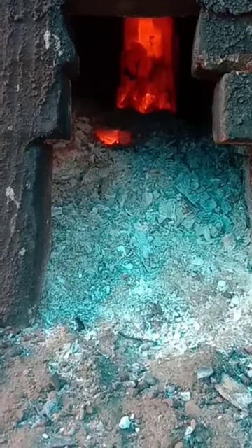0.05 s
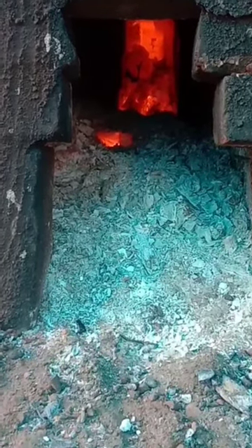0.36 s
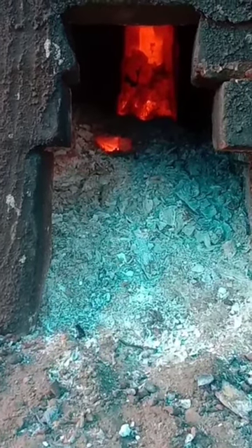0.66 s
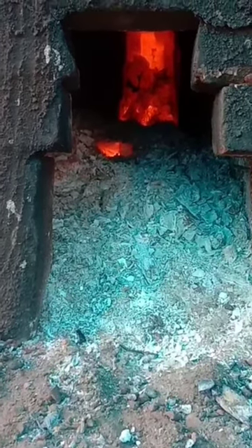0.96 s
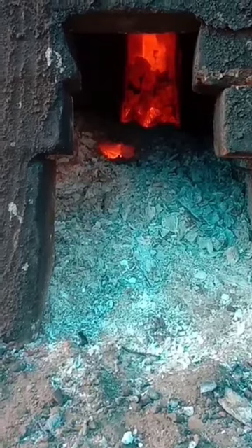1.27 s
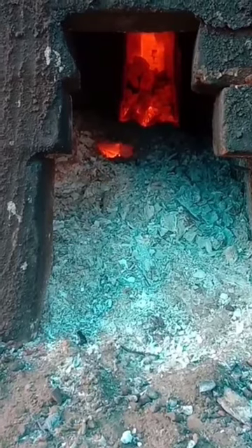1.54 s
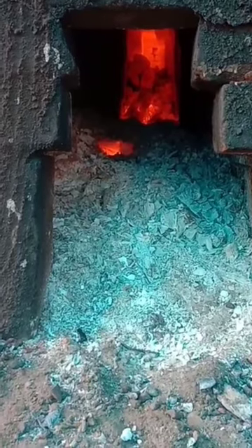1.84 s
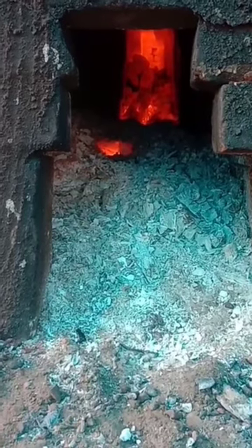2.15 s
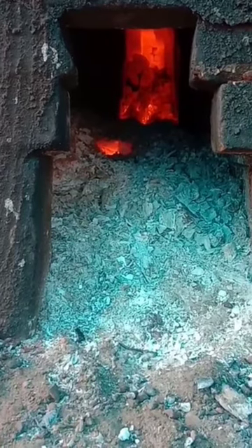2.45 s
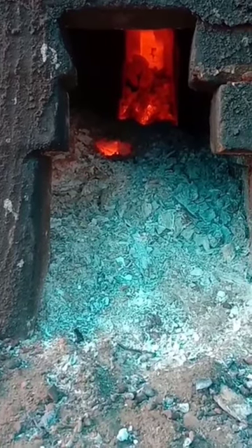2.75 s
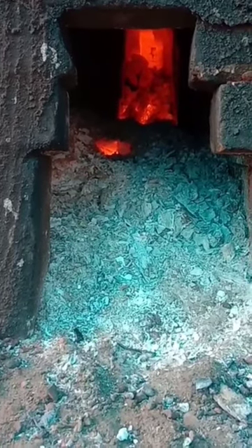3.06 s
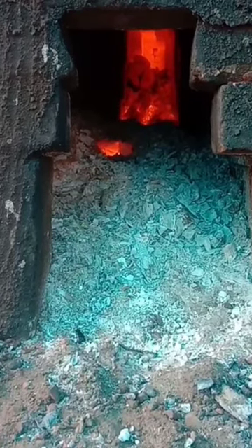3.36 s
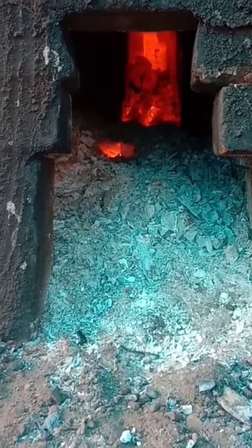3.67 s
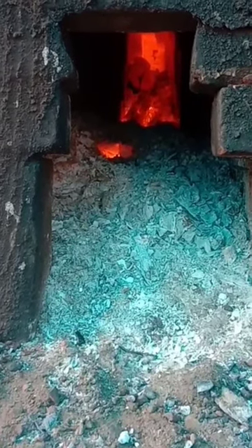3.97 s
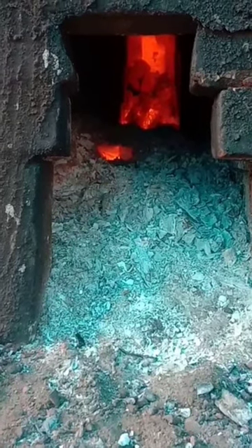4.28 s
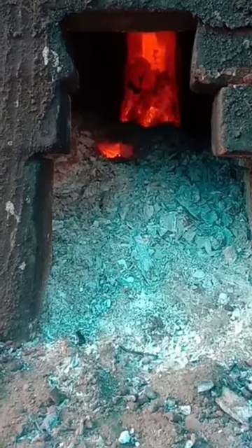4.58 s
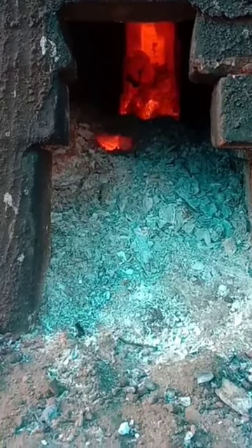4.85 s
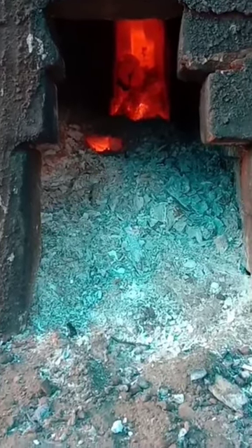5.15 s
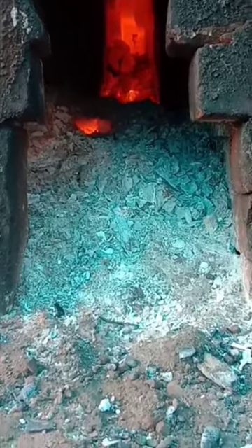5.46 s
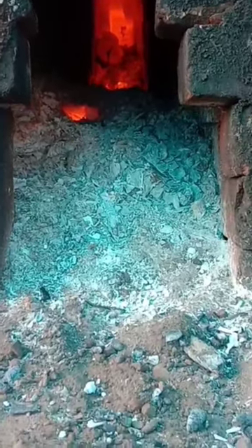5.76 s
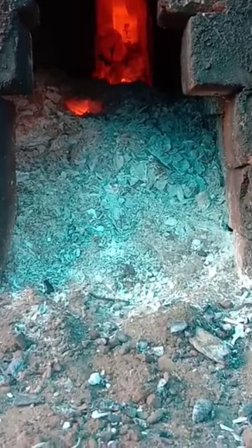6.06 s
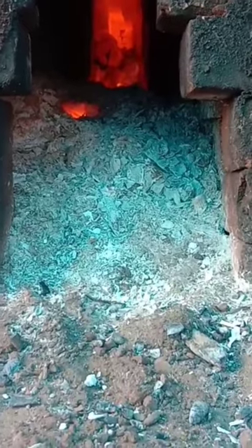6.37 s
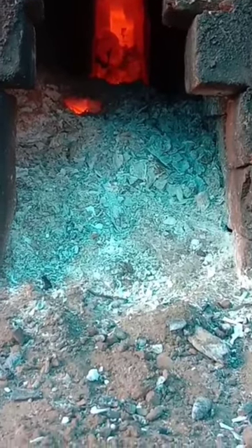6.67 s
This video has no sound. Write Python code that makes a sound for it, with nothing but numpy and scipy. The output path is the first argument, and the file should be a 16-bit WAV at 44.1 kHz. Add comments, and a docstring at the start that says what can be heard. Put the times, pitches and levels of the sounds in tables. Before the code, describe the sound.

Outdoors at the opening of a brick kiln, embers give small, sharp snaps over a low wind rumble and faint hiss. A distant engine throbs underneath. A gust builds, thumping on the microphone and stirring grit into a dry rustle. Then the wind eases and the crackles thin out, leaving the throb and a faint whirr of air. A few more wind thumps and one tiny squeak come near the end.

```python
"""Wind at a brick kiln

Outdoors at the stoke hole, the fire crackles and air whirrs in the flue while a distant engine throbs.
A gust swells in the middle and stirs grit into a dry rustle; its eddies (small swirls of air) thump
on the microphone. A faint hum wavers far away; there are a few soft scuffs of ash and one tiny squeak."""
import sys
import numpy as np
from scipy import signal
from scipy.fft import rfft, irfft
from scipy.io import wavfile
from scipy.ndimage import uniform_filter1d, map_coordinates

SR = 44100
rng = np.random.default_rng(int(sys.argv[2]) if len(sys.argv) > 2 else 0)


def file_out(sig):
    """Save sig as 16-bit WAV at sys.argv[1]."""
    # one column per channel
    cols = np.atleast_2d(sig).T
    # limit, then scale
    lim = np.clip(cols, -1, 1)
    pcm = np.round(lim * 32767).astype(np.int16)
    wavfile.write(sys.argv[1], SR, pcm)


N = 305172
TIME = np.arange(N) / SR

# how strongly the wind blows: (time [s], level [dB])
WIND = [(0, -46.5), (.5, -46), (1.15, -42.5), (1.5, -48.5), (1.75, -39), (2.4, -35.5), (2.67, -32.5),
        (2.92, -41), (3.25, -39.5), (4.3, -56.5), (5.7, -51.5), (6.25, -47), (6.92, -51)]


def from_db(db):
    """Turn decibels into a number to multiply a sound by."""
    return 10 ** (np.asarray(db) / 20)


def rms_one(x):
    """Scale a sound to an average power of 1."""
    return x / np.sqrt(np.mean(x ** 2) + 1e-20)


def in_time(rows):
    """Join a table's points with straight lines, giving one value per sample for each column after time."""
    s, *columns = np.transpose(rows)
    return [np.interp(TIME, s, c) for c in columns]


def cut(x, hz, kind, order=2):
    """Keep the "low" or the "high" side of a sound; a higher order cuts more sharply."""
    return signal.sosfilt(signal.butter(order, min(hz, SR / 2 - 100), kind, fs=SR, output="sos"), x)


def resonate(x, hz, width_hz):
    """Keep the band around one pitch, so that it rings."""
    return signal.lfilter(*signal.iirpeak(hz, hz / width_hz, fs=SR), x)


def drift(rate):
    """A smooth random wobble of about 1, passing through `rate` random values a second."""
    knots = rng.standard_normal(2048)
    return rms_one(map_coordinates(knots, [TIME * rate], order=3, mode="wrap"))


def coloured(x, spectrum):
    """Set how strong the low and high parts of a sound are; the result has power 1."""
    hz, db = np.transpose(spectrum)
    bins = np.maximum(np.fft.rfftfreq(N, 1 / SR), 1)
    gain = from_db(np.interp(np.log(bins), np.log(hz), db))
    return rms_one(irfft(rfft(x) * gain, N))


def evened(x, seconds):
    """Take the slow swells out of a noise, leaving its power near 1."""
    return x / np.sqrt(uniform_filter1d(x ** 2, max(int(seconds * SR), 8)) + 1e-12)


def grains(per_s, spread_db):
    """Random clicks; with a spread above 0, most are small and a few are large."""
    sizes = from_db(spread_db * np.minimum(rng.exponential(1, N), 4)) * rng.choice([-1, 1], N)
    return sizes * (rng.random(N) < per_s / SR)


def wavering(x, depth_db, patch_hz, patch_s):
    """Narrow bands of a noise swell and fade, each on its own, so it sounds hollow and unsteady."""
    hz, s, frames = signal.stft(x, SR, nperseg=1024)
    chance = rng.standard_normal((512, 512))
    grid = np.meshgrid(hz / patch_hz, s / patch_s, indexing="ij")
    swells = map_coordinates(chance, grid, order=2, mode="wrap")
    return rms_one(signal.istft(frames * from_db(depth_db * swells), SR)[1][:N])


def rumble(level_db=1.4, flutter_db=2.0):
    """Churning air around the kiln makes a low, fluttering rumble."""
    # tone of the rumble: (frequency [Hz], level [dB])
    spectrum = [(20, -23), (40, -16), (58, -2), (78, 8.5), (125, 4.5), (165, -2), (215, 0.5), (290, -6),
                (400, -21), (600, -31), (900, -31.5), (1600, -64.5)]
    wind_db, = in_time(WIND)
    noise = evened(coloured(rng.standard_normal(N), spectrum), seconds=0.27)
    return from_db(wind_db + level_db + flutter_db * drift(28)) * noise


def engine(firings_per_s=26.0, boom_hz=104.4, boom_width_hz=14, jitter_s=0.00066, uneven_db=4.5):
    """Each uneven exhaust stroke is a low thud; together they boom near four times the firing rate."""
    # the distant throb, as the wind carries it: (time [s], level [dB])
    throb = [(0, -47), (.72, -59), (.9, -38), (1.55, -45.5), (1.8, -38), (3.2, -40.5), (3.55, -45.5),
             (4.4, -41.5), (4.62, -53), (4.85, -46), (5.5, -46.5), (6.15, -35), (6.55, -40.5),
             (6.92, -41.5)]
    throb_db, = in_time(throb)
    beats = np.flatnonzero(np.diff(np.floor(firings_per_s * TIME)))
    late, strength = rng.standard_normal((len(beats), 2)).T
    at = np.clip(beats + (late * jitter_s * SR).astype(int), 0, N - 1)
    pulses = np.zeros(N)
    pulses[at] = from_db(uneven_db * strength)
    pulses = cut(cut(pulses, 60, "high"), 243, "low", order=3)
    boom = resonate(pulses, boom_hz, boom_width_hz)
    boom = evened(resonate(boom, boom_hz, 3 * boom_width_hz), seconds=0.25)
    knock = from_db(-8) * resonate(pulses, hz=205, width_hz=55)
    thud = resonate(pulses, hz=110, width_hz=55) - knock
    carried_db = throb_db + 2.5 * drift(18)  # it fades in and out on the wind
    return from_db(carried_db) * (boom + from_db(-7.5) * rms_one(thud))


def whirr(pitch_hz=1251, wander_hz=10, width_hz=45, level_db=-3.5):
    """Air drawn through the flue sings around one unsteady pitch."""
    # strength of the whirr: (time [s], level [dB])
    loudness = [(0, -58), (2.4, -53), (3.5, -57.5), (6.6, -58.5), (6.92, -69)]
    whirr_db, = in_time(loudness)
    hz = pitch_hz + wander_hz * drift(1.5)
    swirl = drift(1.5 * width_hz) + 1j * drift(1.4 * width_hz)  # blurs the tone into a narrow noise
    tone = np.exp(2j * np.pi * np.cumsum(hz) / SR)
    return from_db(whirr_db + level_db) * np.real(swirl * tone)


def far_hum(waver=0.02096, fade_db=5.0):
    """A far-off note and the octave above it waver and fade on the wind."""
    # course of the hum: (time [s], pitch [Hz], note level [dB], octave level [dB])
    hum = [(0, 288, -64, -62), (.7, 289, -80, -72), (1.35, 302.3, -72.5, -59.5), (1.8, 303, -58.5, -65.5),
           (3.0, 299, -61, -57.5), (3.8, 301, -54, -63), (4.2, 309.7, -71, -92), (5.5, 312.7, -59.5, -77),
           (6.1, 309.7, -72, -70)]
    hz, *levels_db = in_time(hum)
    phase = 2 * np.pi * np.cumsum(hz * (1 + waver * drift(60))) / SR
    return np.sqrt(2) * sum(from_db(db + fade_db * drift(16)) * np.sin(k * phase)
                            for k, db in enumerate(levels_db, 1))


def roar():
    """A dull, uneven roar swells with the gust."""
    # strength of the roar: (time [s], level [dB])
    loudness = [(0, -58.5), (1.05, -70.5), (1.35, -57.5), (2.1, -60.5), (2.55, -47.5), (3.55, -50.5),
                (3.95, -58.5), (5.4, -60), (6.35, -56), (6.92, -60.5)]
    # tone of the roar: (frequency [Hz], level [dB])
    spectrum = [(150, -17), (240, -1), (320, 6.5), (410, -4.5), (500, -2.5), (590, -0.5), (700, -8.5),
                (950, -9), (1400, -21.5), (2500, -54.5)]
    roar_db, = in_time(loudness)
    noise = coloured(rng.standard_normal(N), spectrum)
    return from_db(roar_db) * wavering(noise, depth_db=4.0, patch_hz=45, patch_s=.14)


def breeze(rush_over_hiss_db=6, loose_grit_db=-21, flutter_db=1.14, rise_s=0.024, fall_s=0.039):
    """Moving air rushes and hisses; the wind keeps a little grit moving, and puffs make it rustle."""
    # strength of the light breeze: (time [s], level [dB])
    air = [(0, -61.5), (1.5, -60), (3.2, -61.5), (4.8, -60.5), (5.5, -64.5), (6.92, -63)]
    # tone of the rushing air: (frequency [Hz], level [dB])
    rush_spectrum = [(250, -2.5), (450, -5.5), (600, -9), (800, -11), (1050, -2.5), (1400, 3.5),
                     (1750, -1.5), (2050, -8), (2600, -13.5), (4000, -20.5)]
    # tone of the high hiss: (frequency [Hz], level [dB])
    hiss_spectrum = [(1500, -26.5), (2400, -32.5), (2700, -6.5), (3000, 14), (3500, -1.5), (4200, 7),
                     (5000, -6), (5600, 5.5), (6300, 7.5), (7300, 10.5), (8000, 5), (12000, -10.5)]
    # tone of the moving grit: (frequency [Hz], level [dB])
    grit_spectrum = [(400, -2), (900, 3), (1300, 8), (1800, 2), (2400, 3), (4500, -5.5), (6200, -0.5),
                     (7500, -4.5), (9500, -4), (13000, -9)]
    # puffs of air that stir the grit: (start [s], length [s], rush level [dB], grit level [dB])
    puffs = [(0.193, 0.089, -55.5, -52.5), (1.13, 0.068, -43, -50), (1.257, 0.046, -45, -60),
             (1.363, 0.41, -50.5, -58), (2.233, .21, -46, -41.5), (2.44, .11, -45, -40),
             (2.62, 0.36, -74, -55.5), (2.836, 0.17, -54.5, -51)]
    air_db, = in_time(air)
    wind_db, = in_time(WIND)
    rush = coloured(rng.standard_normal(N), rush_spectrum)
    rush = wavering(rush, depth_db=4.5, patch_hz=69.84, patch_s=.07)
    hiss = coloured(rng.standard_normal(N), hiss_spectrum)
    hiss = wavering(hiss, depth_db=5.5, patch_hz=111.3, patch_s=.07)
    grit = coloured(grains(per_s=2200 * from_db(4.1 * drift(110)), spread_db=2.0), grit_spectrum)
    grit = wavering(grit, depth_db=4.5, patch_hz=206.7, patch_s=.025)
    rush_gain = from_db(air_db + rush_over_hiss_db)
    grit_gain = from_db(wind_db + loose_grit_db)
    for s, length_s, rush_db, grit_db in puffs:
        rise = np.clip((TIME - s) / rise_s, 0, 1)
        puff = rise * np.exp(-np.maximum(TIME - s - length_s, 0) / fall_s)
        rush_gain = np.hypot(rush_gain, from_db(rush_db) * puff)  # hypot adds their powers
        grit_gain = np.hypot(grit_gain, from_db(grit_db) * puff)
    flutter = from_db(flutter_db * drift(25))
    return flutter * (rush_gain * rush + grit_gain * grit) + from_db(air_db) * hiss


def crackles(snap_s=0.0033, tail_s=0.026, body_s=0.0088, snap_db=-7, tail_db=-15, body_db=-14):
    """An ember snaps at a pitch set by its size, with a dull body and a short scatter off the bricks."""
    # snapping embers: (time [s], level [dB], extra level of the body [dB], pitch [Hz])
    embers = [(0.17, -43, 3, 3970), (0.2443, -31, -25, 6700), (0.4861, -30, -26, 6940),
              (0.598, -34, -26, 6240), (0.622, -34.5, -29, 6300), (0.9909, -34.5, -16, 7350),
              (1.1543, -34.5, -3, 6230), (1.28, -44, 10, 3800), (1.6116, -37.5, 7.5, 6050),
              (1.7779, -32.5, -16, 4340), (2.128, -38, 6, 5930), (2.473, -25, -6, 3670),
              (2.6412, -39, 8, 3110), (3.0241, -25.5, -1.5, 5000), (4.6695, -37, -23, 6210),
              (4.7581, -40.5, -14, 5900), (6.2728, -41.5, -7, 3880)]
    out, t = np.zeros(N + SR), TIME[:SR // 8]
    for s, level_db, dull_db, hz in embers:
        bright, dull = rng.standard_normal((2, len(t)))
        bright = cut(bright, 3400, "high", order=3)
        bright = rms_one(bright + 2.9 * resonate(bright, hz, width_hz=700))
        snap = bright * (np.exp(-t / snap_s) + from_db(tail_db) * np.exp(-t / tail_s))
        body = rms_one(cut(cut(dull, 760, "high"), 2000, "low")) * np.exp(-t / body_s)
        crackle = from_db(snap_db) * snap + from_db(body_db + dull_db) * body
        at = int(s * SR)
        out[at:at + len(t)] += from_db(level_db) * crackle
    return out[:N]


def ticks(decay_s=0.0059, low_hz=7800):
    """The tiniest embers snap with only a thin, very high tick."""
    # tiny embers: (time [s], level [dB])
    embers = [(.487, -30), (4.216, -38), (4.887, -38), (5.888, -40)]
    fizz = rms_one(cut(rng.standard_normal(N), low_hz, "high", order=4))
    return fizz * sum(from_db(db) * (TIME >= s) * np.exp(-np.abs(TIME - s) / decay_s)
                      for s, db in embers)


def scuffs(low_hz=900, high_hz=3000):
    """Ash crunches in short, sudden bursts of dull grains."""
    # soft scuffs: (time [s], level [dB], fade time [s])
    bursts = [(1.152, -35, 0.0075), (1.277, -38, 0.011), (2.127, -47.5, 0.0077), (3.568, -50, 0.025),
              (3.992, -57, .015)]
    ash = grains(per_s=2700, spread_db=0.0)
    crunch = rms_one(cut(cut(ash, low_hz, "high"), high_hz, "low"))
    return crunch * sum(from_db(db) * (TIME >= s) * np.exp(-np.abs(TIME - s) / decay_s)
                        for s, db, decay_s in bursts)


def eddy_runs(gap_s=.018, jitter_s=.003, follower_db=-6.5):
    """Each blow of wind opens with its strongest eddy; weaker ones follow unevenly while it lasts."""
    # blows on the microphone: (time [s], length [s] or 0 for one eddy, level [dB], brightness [Hz])
    blows = [(1.224, 0, -15, 273), (1.407, 0, -24, 183), (1.642, 0, -19.5, 400), (1.657, .045, -8.5, 460),
             (1.709, .028, -9.5, 330), (1.82, .028, -15, 200), (1.987, .028, -7, 280),
             (2.099, 0, -17.5, 274), (2.128, 0, -13.5, 343), (2.173, 0, -17, 310), (2.505, .045, -8, 342),
             (2.603, .028, -9, 265), (2.674, .028, -19.5, 260), (2.779, 0, -21.5, 250),
             (3.039, 0, -14.5, 500), (3.052, 0, -8, 667), (3.066, 0, -14, 290), (3.202, 0, -13, 283),
             (3.238, 0, -12.5, 313), (3.263, .028, -12, 414), (6.057, 0, -19.5, 160),
             (6.152, .028, -10.5, 350), (6.244, .045, -11.5, 360)]
    for s, length_s, level_db, bright_hz in blows:
        yield s, level_db, bright_hz
        for k, late in enumerate(rng.uniform(-1, 1, 6), 1):
            if k * gap_s < length_s:
                yield s + k * gap_s + late * jitter_s, level_db + follower_db, bright_hz


def eddies(port_hz=92, leak_db=-27, wake_db=-26, wake_s=0.015, gain_db=-2.5):
    """Each eddy hits the microphone with one blunt push of air and a short, ragged wake."""
    out, t = np.zeros(N + SR), TIME[:SR // 5]
    for s, level_db, bright_hz in eddy_runs():
        push = from_db(wake_db) * rng.standard_normal(len(t)) * np.exp(-t / wake_s)
        push[0] += 1  # the hit itself, ahead of its wake
        push = cut(push, 0.44 * bright_hz, "low")
        push = cut(push, 1.47 * bright_hz, "low", order=4)
        push = cut(push, port_hz, "high", order=3) + from_db(leak_db) * push  # little slow push gets in
        ring = resonate(push, hz=125, width_hz=50) + 0.72 * resonate(push, hz=247, width_hz=92)
        thump = push + 0.5 * ring
        at = int(s * SR)
        out[at:at + len(t)] += from_db(level_db + gain_db) * thump / np.abs(thump).max()
    return out[:N]


def squeak(waver=0.016):
    """One faint, rough tone slides up and back down."""
    # course of the squeak: (time [s], pitch [Hz], level [dB])
    glide = [(6.19, 1630, -82), (6.225, 1657, -64), (6.25, 1750, -45), (6.29, 1870, -61), (6.37, 1780, -66),
             (6.48, 1730, -55), (6.56, 1525, -82)]
    hz, level_db = in_time(glide)
    sounding = (TIME > glide[0][0]) & (TIME < glide[-1][0])
    phase = 2 * np.pi * np.cumsum(hz * (1 + waver * drift(200))) / SR
    return sounding * from_db(level_db) * np.sin(phase)


def scene():
    """Everything reaches one microphone, so both channels are alike."""
    fire = whirr() + crackles() + ticks()
    wind = rumble() + roar() + eddies() + breeze()
    sound = fire + wind + engine() + far_hum() + scuffs() + squeak()
    return np.array([sound, sound])


def record(dry):
    """The microphone lifts the middle pitches and dulls the highs; a faint, steady noise lies behind."""
    # tone of the background noise, strongest in the bass: (frequency [Hz], level [dB])
    noise_spectrum = [(20, 21.5), (1200, 3), (4000, 2), (10000, -9), (14000, -13.5), (15000, -6),
                      (16000, -11.5)]
    sound = dry + .5 * resonate(dry, hz=1232, width_hz=220)
    sound = sound - .82 * resonate(sound, hz=6650, width_hz=400)  # a narrow dip in the highs
    faint_highs = from_db(-35.5) * cut(sound, 6600, "high", order=4)
    sound = cut(sound, 7190, "low", order=11) + faint_highs
    background = np.array([coloured(rng.standard_normal(N), noise_spectrum) for channel in dry])
    sound = sound + from_db(-72.0) * (background + 0.42 * background[::-1])  # each side differs a little
    sound = sound * from_db([[0], [.1]])  # the right side is a touch louder
    top_cut = signal.ellip(12, .1, 90, 15500, fs=SR, output="sos")  # steep cut above 15500 Hz
    return signal.sosfilt(top_cut, sound)


dry = scene()
out = record(dry)
file_out(out)
```